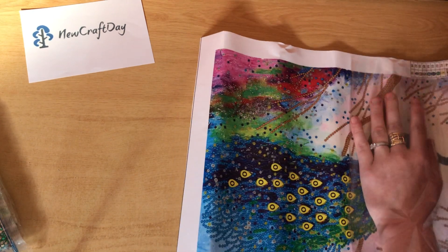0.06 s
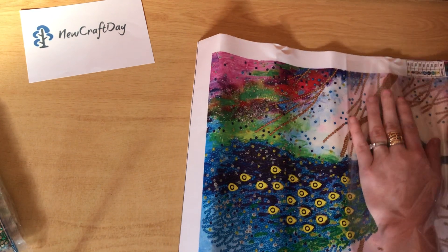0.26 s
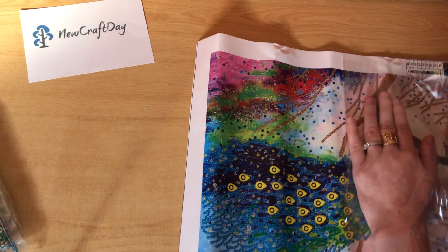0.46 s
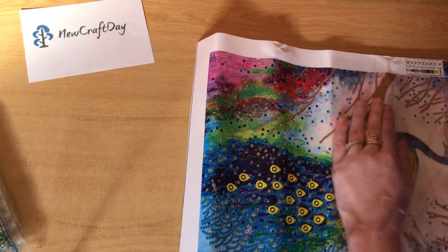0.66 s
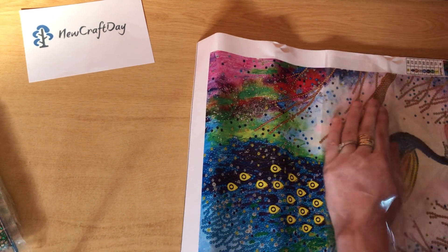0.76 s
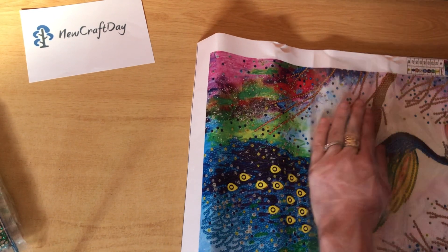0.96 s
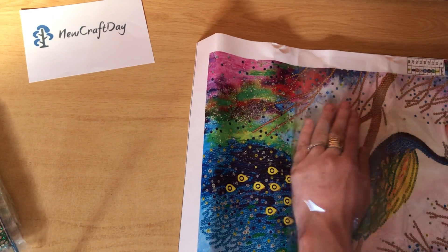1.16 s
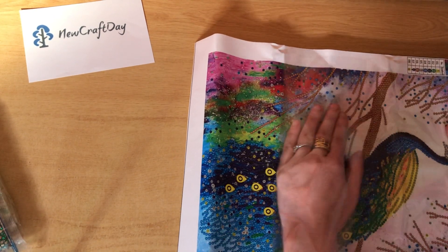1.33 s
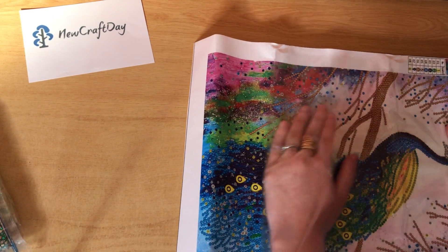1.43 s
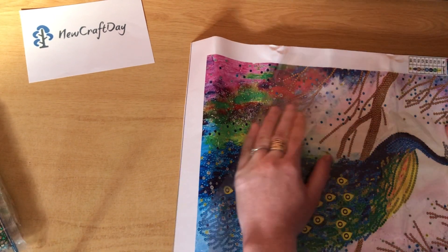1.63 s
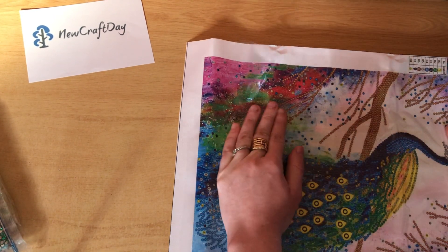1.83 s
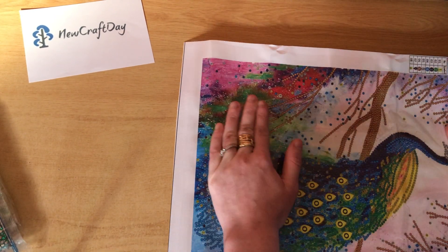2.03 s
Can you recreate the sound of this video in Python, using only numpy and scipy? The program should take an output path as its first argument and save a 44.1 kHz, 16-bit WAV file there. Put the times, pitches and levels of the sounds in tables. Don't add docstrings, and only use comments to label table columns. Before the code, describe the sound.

Plastic film over canvas crinkles under a smoothing hand: faint rustle first, then sharp bright snaps thickening before one second, a lull, and another dense burst before fading; close microphone, quiet small room.

```python
import sys
import numpy as np
from scipy import signal
from scipy.fft import rfft, irfft, next_fast_len
from scipy.io import wavfile
from scipy.ndimage import uniform_filter1d, map_coordinates

SR = 44100
rng = np.random.default_rng(int(sys.argv[2]) if len(sys.argv) > 2 else 0)


def voltage_ratio(level):
    return 10 ** (np.asarray(level, float) / 20)


def file_out(sig):
    cols = np.atleast_2d(sig).T
    lim = np.clip(cols, -1, 1)
    pcm = np.round(lim * 32767).astype(np.int16)
    wavfile.write(sys.argv[1], SR, pcm)


N = 92610


def along(points, hz):
    f, v = np.transpose(points)
    return np.interp(np.log(hz + 1), np.log(f + 1), v)


def unit(x):
    return x / np.sqrt(np.mean(x ** 2) + 1e-20)


def wobble(rate):
    knots = rng.standard_normal(int(N * rate / SR) + 4)
    return map_coordinates(knots, [np.arange(N) * rate / SR])


def coloured(x, points):
    cepstrum = irfft(np.log(voltage_ratio(along(points, np.fft.rfftfreq(4096, 1 / SR)))))
    cepstrum[1:2048] *= 2
    cepstrum[2049:] = 0
    h = irfft(np.exp(rfft(cepstrum)))
    return signal.fftconvolve(x, h / np.linalg.norm(h))[:N]


def patchy(depth_db):
    z = signal.stft(rng.standard_normal(N), nperseg=256)[2]
    field = uniform_filter1d(rng.standard_normal(z.shape), size=6, axis=0)
    field = uniform_filter1d(field, size=5, axis=1)
    return unit(signal.istft(z * voltage_ratio(depth_db * unit(field)), nperseg=256)[1][:N])


def microphone_hiss():
    return voltage_ratio(-75) * rng.standard_normal(N)


# (frequency [Hz], level [dB per Hz])
HUM_TONE = [(15, -30), (35, -19), (67, 1), (110, -9), (250, -5.5), (600, -13), (1100, -6), (3000, -21)]


def room_hum():
    level_db = -59 + 3.1 * wobble(6.01)
    return voltage_ratio(level_db) * unit(coloured(patchy(1.0), HUM_TONE))


# (frequency [Hz], time to fall by 60 dB [s])
WALL_DECAY = [(500, 0.43), (3000, 0.56), (12000, 0.087)]


def walls(x, count=7):
    out = np.zeros(N)
    stretch = np.arange(N) * count // N
    for k in range(count):
        hz, t, z = signal.stft(rng.standard_normal(SR // 3), SR, nperseg=256)
        decay = voltage_ratio(-60 * t / along(WALL_DECAY, hz)[:, None])
        tail = signal.istft(z * decay, SR, nperseg=256)[1]
        tail = np.pad(tail / np.linalg.norm(tail), (130, 0))
        out += signal.fftconvolve(x * (stretch == k), tail)[:N]
    return out


# (frequency [Hz], level [dB])
DRAG_TONE = [(80, -24), (150, -2), (260, 0), (600, -6), (1100, -13), (2500, -40)]


def heel_drag():
    middle_s, width_s = 1.185, .045
    stroke = np.exp(-((np.arange(N) / SR - middle_s) / width_s) ** 2)
    return voltage_ratio(-55) * stroke * unit(coloured(patchy(1), DRAG_TONE))


# (frequency [Hz], width [Hz], level [dB])
TABLE_MODES = [(156, 14, -70.5), (376, 14, -73)]


def table_modes():
    out = np.zeros(N)
    for hz, width_hz, db in TABLE_MODES:
        b, a = signal.iirpeak(hz, hz / width_hz, SR)
        out += voltage_ratio(db) * unit(signal.lfilter(b, a, rng.standard_normal(N)))
    return out


# (time [s], level [dB], pitch [Hz], time to fall by 60 dB [s])
NUDGES = [(.002, -53, 520, .12), (.345, -55, 66, .12), (.64, -51, 68, .16), (.715, -54, 68, .1),
          (.976, -46, 150, .06), (.981, -45, 70, .09), (1.005, -51, 330, .06), (.974, -52, 260, .05),
          (1.165, -54, 250, .08), (1.2, -53, 200, .1), (1.07, -55, 1050, .12), (1.06, -57, 700, .2),
          (.347, -47, 1080, .07), (1.69, -53, 150, .1), (1.79, -53, 75, .12), (2.024, -54, 1110, .2),
          (2.046, -55, 1130, .15)]


def table_nudges():
    out = np.zeros(N + SR)
    t = np.arange(SR // 4) / SR
    for s, db, hz, t60 in NUDGES:
        soft_start = 1 - np.exp(-t / .005)
        swing = voltage_ratio(db - 60 * t / t60) * np.sin(2 * np.pi * hz * t) * soft_start
        out[round(s * SR):][:len(t)] += swing
    return out[:N]


# (frequency [Hz], level [dB])
FILM_TONE = [(500, -31), (1500, -37), (4000, -7.5), (7000, 0), (12000, -0.5), (16000, -3.5)]
# (frequency [Hz], level [dB])
CANVAS_TONE = [(300, -25), (700, -16), (1150, -8), (3500, -1), (7000, -4.5), (12000, -16.5), (16000, -6.5)]


def sheet(dull, bright):
    return coloured(dull, CANVAS_TONE) + coloured(bright, FILM_TONE)


def crackle(count=900):
    centre_hz, spread_octaves, cycles, roughness, range_db = 6000, .8, 3, .5, 34
    draw = rng.random((count, 2))
    t = np.arange(SR // 200) / SR
    hz = centre_hz * 2 ** (spread_octaves * rng.standard_normal((count, 1)))
    hz = np.clip(hz, 3500, 15000)
    ticks = np.sin(2 * np.pi * hz * t) * np.exp(-t * hz / cycles)
    ticks = ticks * (1 + roughness * rng.standard_normal(ticks.shape))
    ticks = ticks * voltage_ratio(-range_db * np.sqrt(draw[:, 1:]))
    where = (draw[:, :1] * N).astype(int) + np.arange(len(t))
    return np.bincount(where.ravel(), ticks.ravel(), N + SR)[:N]


# (time [s], rub level [dB], brightness [0-1])
PRESSURE = [(0, -55.5, 0), (.12, -57, 0), (.2, -54, 0.03), (.25, -45, 0), (.41, -49, 0.3), (.54, -55.5, 0),
            (.66, -41.5, 0.1), (.74, -50.5, 0.3), (.85, -46, 0), (1.04, -52, 0.4), (1.17, -54.5, 0),
            (1.34, -49.5, 0.35), (1.5, -41.5, 0.28), (1.67, -48, 0.06), (1.77, -48.5, 0.5),
            (1.871, -51.5, 0.22), (1.97, -59.5, 0), (2.04, -77, 0)]


def hand():
    s, level, bright = np.transpose(PRESSURE)
    t = np.arange(N) / SR
    level, bright = np.interp(t, s, level), np.interp(t, s, bright)
    flutter_db = 4.5 * wobble(39.62)
    gain = voltage_ratio(level - 1.5 + flutter_db)
    dull_rub = gain * np.sqrt(1 - bright) * patchy(3)
    bright_rub = gain * np.sqrt(bright) * patchy(3)
    crackle_db = level.mean() + 2.3 * (level - level.mean()) + 9
    return sheet(dull_rub, bright_rub) + crackle() * voltage_ratio(crackle_db)


# (time [s], level [dB], brightness [0-1], volley length [ms])
CREASE_SNAPS = [(0.2104, -32.6, 0.42, 2.5), (0.2396, -42.3, 0.77, 2.0), (0.2709, -41.7, 0.0, 2.0),
                (0.34, -45.6, 0.57, 1.5), (0.4683, -44.0, 0.65, 1.5), (0.4915, -44.1, 0.06, 1.5),
                (0.516, -42.8, 0.05, 1.5), (0.5521, -30.0, 0.39, 3.0), (0.5967, -27.8, 0.3, 2.2),
                (0.6027, -52.2, 0.09, 1.5), (0.6567, -37.5, 0.71, 1.5), (0.6692, -36.2, 0.33, 2.0),
                (0.6847, -42.6, 0.68, 1.5), (0.7532, -31.1, 0.24, 2.5), (0.775, -28.2, 1.0, 1.5),
                (0.7875, -36.2, 0.24, 1.5), (0.8073, -31.3, 0.87, 1.5), (0.8144, -34.0, 0.55, 1.5),
                (0.8306, -27.7, 1.0, 2.0), (0.8434, -34.2, 0.87, 1.5), (0.8535, -35.3, 0.55, 2.0),
                (0.8682, -22.0, 1.0, 2.8), (0.9187, -36.7, 0.45, 2.0), (0.9382, -18, 0.95, 1.6),
                (0.9668, -29.0, 0.61, 2.0), (1.0371, -37.5, 0.55, 1.5),
                (1.0736, -26.5, 0.97, 1.5), (1.087, -40.3, 0.18, 1.5), (1.1301, -44.8, 0.23, 1.5),
              (1.2332, -33.9, 0.76, 3.0), (1.2906, -42.8, 0.42, 1.8), (1.3063, -45.1, 0.68, 1.8),
              (1.3314, -45.6, 0.0, 1.8), (1.3721, -40.9, 0.31, 1.8), (1.4145, -36.7, 0.29, 1.8),
              (1.4298, -40.4, 0.7, 1.8), (1.4391, -34.9, 0.15, 1.8), (1.4904, -33.8, 0.27, 1.8),
              (1.5113, -27.8, 0.67, 1.8), (1.5783, -43.5, 0.56, 1.8), (1.5965, -28.9, 0.88, 1.8),
              (1.6604, -42.3, 0.22, 1.8), (1.6948, -30.5, 0.61, 3.0), (1.699, -26.5, 1.0, 2.0),
              (1.7237, -22.8, 0.88, 2.0), (1.7324, -28.2, 1.0, 1.2), (1.7452, -20.5, 1.0, 1.2),
              (1.7488, -27, 0.7, 1.8), (1.7667, -29.1, 0.59, 2.0), (1.799, -31.8, 0.77, 1.8),
              (1.8188, -39.2, 0.82, 1.5), (1.8336, -36.6, 0.74, 1.5), (1.8887, -44.3, 0.69, 1.5),
              (1.9105, -45.4, 1.0, 1.5), (1.9433, -51.1, 0.24, 1.5), (1.9909, -50.4, 1.0, 1.5)]
# (time [s], level [dB], brightness [0-1], volley length [ms])
CRUMPLES = [(0.033, -41, 0.25, 6.0), (0.163, -50, 0.1, 16.0), (0.214, -41, 0.05, 16.0),
            (0.26, -45.6, 0.04, 4.0), (0.287, -45.9, 0.07, 6.0), (0.299, -44.3, 0.48, 6.0),
            (0.306, -41.8, 0.3, 7.0), (0.346, -35, 0.3, 4.0), (0.3487, -29.5, 0.15, 4.5),
            (0.3745, -33, 0.1, 9.0), (0.384, -37.5, 0.1, 12.0), (0.608, -34.6, 0.35, 6.0),
            (0.6295, -31.5, 0.49, 6.0), (0.7485, -37, 0.95, 3), (0.8925, -34.5, 0.6, 5.0),
            (0.9405, -28, 0.7, 4.0), (1.0095, -38, 0.4, 3.0), (1.022, -35, 0.08, 7.0),
            (1.345, -30.3, 0.93, 5.0), (1.453, -40, 0.5, 10), (1.4657, -26.5, 0.87, 2.6),
            (1.479, -34.8, 0.28, 7.0), (1.5445, -31, 0.55, 2.5), (1.6105, -35.5, 0.19, 4.0),
            (1.689, -39, 0.3, 8.0), (1.7055, -32.5, 0.5, 6.0), (1.727, -31, 0.5, 4.0),
            (1.753, -33, 0.4, 11.0)]
# (time [s], level [dB], brightness [0-1], volley length [ms])
TICKS = [(.0285, -48, .3, 3), (.0421, -44, .1, 2), (.053, -49, 0, 9), (.0802, -53, 0, 1.5),
         (.0848, -50, .2, 3), (.1096, -52, 0, 3), (.114, -48, 0, 6), (.129, -46, .15, 2.4),
         (.1374, -51, 0, 3), (.1715, -43, 0, 6), (.222, -41, .1, 5), (.2349, -40, 0, 2.6),
         (.3645, -36, 0, 2.5), (.4154, -43, .2, 2.5), (.4374, -43, 0, 2.4), (.4437, -45, .05, 7),
         (.5047, -45, 0, 3.4), (.5374, -50, .2, 3), (.5434, -47, .15, 2), (.7616, -43, .4, 3),
         (.8378, -38, .5, 1.9), (.9539, -37, .4, 2.9), (1.0135, -38, .05, 7), (1.0591, -46, .2, 1.7),
         (1.1859, -51, 0, 1.5), (1.2441, -41, .15, 1.7), (1.2857, -47, .6, 2.7), (1.3133, -49, .2, 3),
         (1.4091, -46, .4, 2.5), (1.4711, -31, .7, 2.3), (1.5328, -38, .4, 2.6), (1.5478, -29, .5, 2.6),
         (1.6174, -37, .3, 2), (1.6345, -41, .2, 6), (1.6819, -41, .1, 4), (1.771, -36, .3, 9),
         (1.785, -41, .1, 6), (1.8153, -40, .45, 1.5), (1.84, -44, .9, 1.5), (1.8636, -43, 0, 2),
         (1.9324, -53, 0, 2), (1.9504, -52, .8, 2), (1.956, -50, .7, 2.5), (1.9615, -53, .4, 2),
         (2.012, -57, 0, 1.8), (2.0577, -60, .5, 2), (2.0639, -55, .1, 2), (2.0834, -55, .9, 2),
         (2.0909, -56, .25, 2.5), (2.0975, -56, .6, 2)]


def snaps():
    cracks_per_ms, crack_ms, scatter_db, rise_share = 5, .3, 3, .2
    smooth_from_ms = 2.5
    settle_db, settle_ms, settle_duller = -11, 7, .5
    out = np.zeros((2, N + SR))
    t_ms = np.arange(SR // 20) * 1000 / SR
    for s, db, bright, length_ms in [*CREASE_SNAPS, *CRUMPLES, *TICKS]:
        draw = rng.standard_normal((96, 2))
        noise = np.tanh(rng.standard_normal((2, len(t_ms))))

        starts = (np.cumsum(draw[:, 0] ** 2) - draw[0, 0] ** 2) / cracks_per_ms
        u = starts / length_ms
        swell = np.minimum(1, .5 + u / rise_share / 2) * np.exp(-u ** 2)
        sizes = voltage_ratio(scatter_db * draw[:, 1]) * swell

        age = t_ms - starts[:, None]
        decay_ms = crack_ms * max(1, length_ms / smooth_from_ms)
        power = sizes[:, None] ** 2 * np.exp(-2 * np.abs(age) / decay_ms) * (age >= 0)
        volley = np.sqrt(power.sum(axis=0))
        early = t_ms < 1.2 * length_ms
        volley = volley / np.sqrt(np.mean(volley[early] ** 2))

        shiver = voltage_ratio(settle_db) * np.exp(-t_ms / settle_ms) * (1 - np.exp(-t_ms))
        dulled = bright * settle_duller
        both = volley * np.sqrt([[1 - bright], [bright]])
        both = both + shiver * np.sqrt([[1 - dulled], [dulled]])
        both = both * noise
        both = both / np.sqrt(np.mean(both[:, early] ** 2) * 2)
        out[:, round(s * SR):][:, :len(t_ms)] += voltage_ratio(db + 1) * both
    return sheet(out[0, :N], out[1, :N])


def scene():
    crisp = snaps()
    room = room_hum() + microphone_hiss() + voltage_ratio(-10) * walls(crisp)
    rubbing = hand()
    table = heel_drag() + table_modes() + table_nudges()
    return (room + table + rubbing + crisp)[None]


def roll_off(x):
    return signal.sosfilt(signal.butter(12, 16960, fs=SR, output="sos"), x)


def record(dry):
    top_hz, leak_db = 15880, -40
    m = next_fast_len(N + 8192)
    edge = voltage_ratio(leak_db) + 1 / (1 + (np.fft.rfftfreq(m, 1 / SR) / top_hz) ** 300)
    mix = irfft(rfft(dry, m) * edge, m)[:, :N]
    return roll_off(mix)


dry = scene()
out = record(dry)
file_out(out)
```